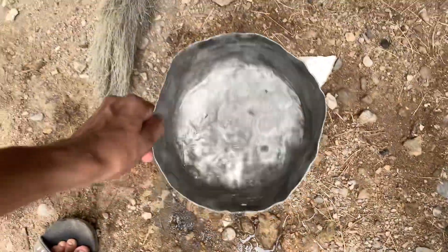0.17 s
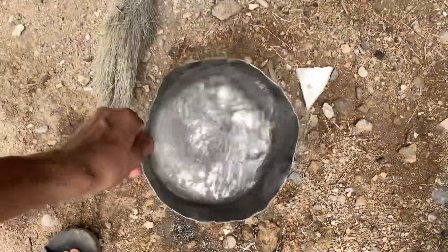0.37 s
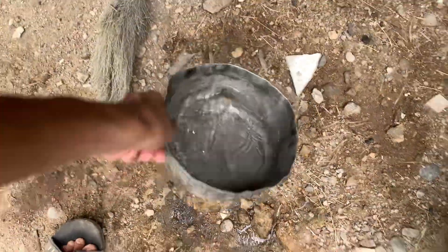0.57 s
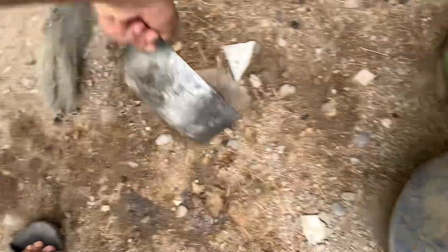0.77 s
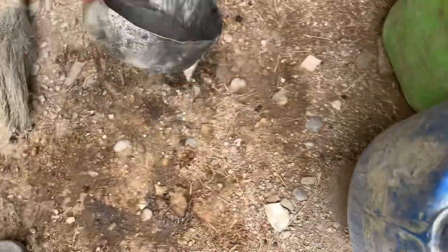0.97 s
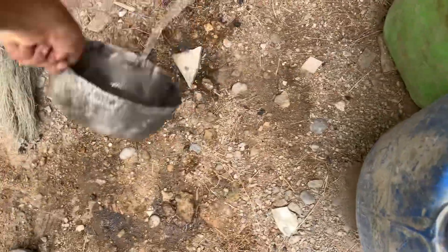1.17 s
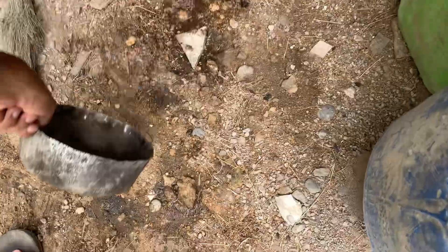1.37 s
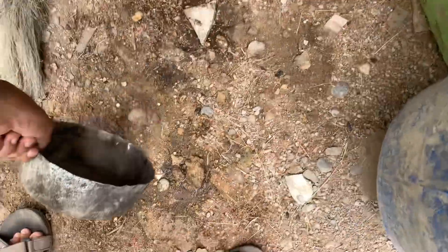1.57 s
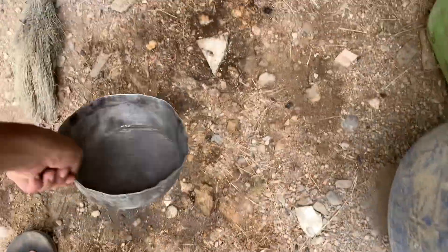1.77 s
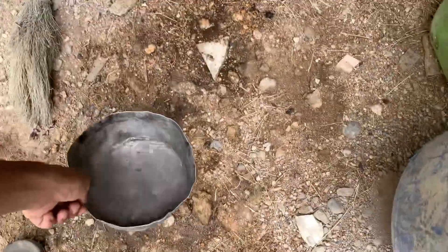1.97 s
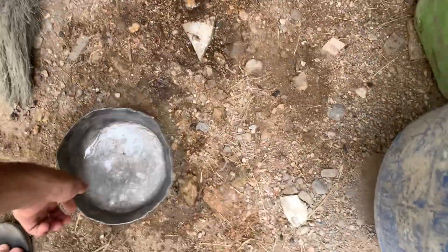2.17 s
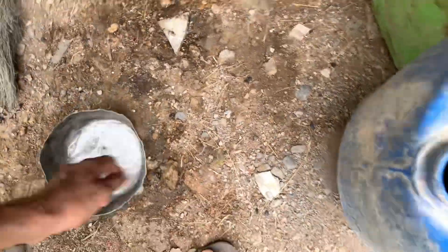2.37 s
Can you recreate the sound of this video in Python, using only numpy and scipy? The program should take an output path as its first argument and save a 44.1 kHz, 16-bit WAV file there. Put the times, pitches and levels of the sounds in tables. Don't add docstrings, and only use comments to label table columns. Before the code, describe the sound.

Metal bowl emptied of water with drips and bubbles, then scraping and three clanking knocks outdoors

```python
import sys
import numpy as np
from scipy import signal
from scipy.fft import rfft, irfft, next_fast_len
from scipy.io import wavfile
from scipy.ndimage import uniform_filter1d

SR = 44100
rng = np.random.default_rng(int(sys.argv[2]) if len(sys.argv) > 2 else 0)


def to_linear_factor(level_db):
    exponent = np.asarray(level_db, float) / 20
    return 10 ** exponent


def put_to_file(sound):
    columns = np.atleast_2d(sound).T
    safe = np.clip(columns, -1, 1)
    whole_steps = np.round(safe * 32767)
    wavfile.write(sys.argv[1], SR, whole_steps.astype(np.int16))


N = 106413

# pitch_hz, level_db [dB per Hz]
FAR_SPECTRUM = [(12, -61), (28, -18), (77, 2), (143, -13.5), (479, -27), (634, -29.5), (863, -38),
                (1020, -40), (16500, -81.5)]
# pitch_hz, level_db
FAR_SIDE_SPECTRUM = [(60, -11.5), (250, -8.5), (700, 3.5), (5000, 6.5), (15000, -25)]
# start_s, peak_db, pitch_hz, t60_s, glide_octaves_per_s
BUBBLE_EVENTS = [(0, -47, 1236, 0.18, 0.6), (0.111, -40.5, 1046, 0.24, 1.8), (0.152, -57, 1278, 0.67, 3.5),
                 (0.234, -56, 1280, 0.99, 2), (0.264, -39.5, 1800, 0.067, 1), (.295, -50, 1073, 0.12, -11),
                 (.322, -43.5, 2083, 0.19, -0.7), (.335, -45, 700, 0.089, 11.5),
                 (.37, -37, 2036, 0.13, 0.8), (.58, -60.5, 1010, 0.74, -0.5), (.11, -34, 993, 0.026, 2),
                 (0.189, -48, 2750, 0.033, 1.5), (.8, -49, 902, 0.31, .3), (.32, -45, 1700, 0.094, 0.5),
                 (.4, -55, 1255, .4, 0.8), (.38, -54, 940, 0.25, 0.5), (.43, -47, 1900, 0.1, -2.5),
                 (.465, -53, 1694, 0.18, .2), (.5, -54.5, 1904, 0.19, 1.5), (.6, -61, 2210, 0.18, 0),
                 (.715, -45, 2250, 0.037, 5), (.772, -41.5, 300, .08, 5), (.762, -40.5, 2530, 0.092, -1.5),
                 (.962, -39, 2195, 0.049, 0), (1.255, -34, 1008, 0.016, 25), (2.317, -33, 2470, 0.054, -1),
                 (.761, -41, 1743, 0.19, 3), (0.779, -33, 759, 0.054, 0), (.843, -31.5, 2290, 0.056, -4),
                 (0.846, -29, 2664, 0.041, 7.5), (0.847, -40.5, 1506, 0.11, -1),
                 (0.948, -30.5, 1437, 0.026, 1), (1.135, -41.5, 3040, 0.027, 4), (1.165, -44, 2240, .03, 6),
                 (1.44, -34, 3694, 0.028, 1.5)]
# start_s, spray_db, slosh_db
WATER_LEVELS = [(0, -63.5, -56), (.06, -72.5, -69.5), (.145, -53.5, -56), (.225, -58.5, -66.5),
                (.32, -42, -51.5), (.44, -79, -60), (.57, -74.5, -68.5), (.65, -60.5, -66),
                (.74, -60, -64.5), (.77, -50, -47), (.94, -40.5, -59), (1.13, -66.5, -77),
                (1.3, -45.5, -63), (1.43, -51.5, -69), (1.55, -76.5, -73), (1.95, -79, -77),
                (1.98, -63.5, -72.5), (2.07, -80, -81)]
# pitch_hz, level_db [dB per Hz]
SPRAY_SPECTRUM = [(1500, -44.5), (2500, -6), (4000, -8), (7000, -2), (10500, 2), (13500, -9.5),
                  (16000, -19)]
# start_s, peak_db
SNAP_EVENTS = [(0.0236, -57), (0.0692, -60), (0.0832, -40), (0.1074, -31), (0.1214, -58), (0.1311, -28.5),
               (0.1526, -15.5), (0.1694, -45), (0.1777, -63), (0.1884, -42), (0.2038, -33), (0.2284, -55),
               (0.2344, -46), (0.2472, -34), (0.2634, -34), (0.2774, -25), (0.313, -37), (0.3214, -44),
               (0.3374, -52), (0.3804, -19), (0.398, -35), (0.4277, -34.5), (0.4454, -49), (0.4798, -38),
               (0.5911, -48), (0.641, -36.5), (0.7342, -35), (0.7921, -36), (0.84, -27), (0.8594, -27),
               (0.8717, -26), (0.895, -31), (0.9114, -28), (1.0294, -46), (1.055, -44), (1.1016, -34),
               (1.1964, -39), (1.2545, -12.5), (1.2745, -3)]
# start_s, peak_db, pitch_hz, t60_s
TICK_EVENTS = [(0.0363, -38.5, 7800, 0.018), (0.1091, -31, 4740, 0.017), (0.1529, -16, 7000, 0.016),
               (0.1857, -38, 10800, 0.02), (0.204, -36.5, 7500, 0.014), (0.2583, -30.5, 9400, 0.027),
               (0.2776, -36, 11200, 0.018), (0.3685, -29.5, 7100, 0.018), (0.3803, -20.5, 10100, 0.017),
               (0.4182, -32.5, 12300, 0.023), (0.492, -39, 11000, 0.017), (0.7608, -35.5, 5530, 0.013),
               (0.842, -24, 9040, 0.018), (0.9609, -27, 7190, 0.015), (1.1601, -36, 9800, 0.013),
               (1.1957, -39.5, 8500, 0.024), (1.2492, -18, 10400, 0.018), (1.2536, -17.5, 10100, 0.021),
               (1.2745, -5, 9260, 0.016), (1.4398, -26, 3750, 0.018), (1.4666, -32.5, 10300, 0.017),
               (1.4982, -37, 11000, 0.018), (1.9669, -49, 9760, 0.018), (2.3741, -8.5, 9240, 0.016),
               (2.0232, -47.5, 8540, 0.021), (2.236, -32, 3830, 0.03)]
# start_s, level_db
SCRAPE_LEVELS = [(2.09, -74), (2.12, -54.5), (2.138, -34), (2.18, -47), (2.24, -41.5), (2.29, -46.5),
                 (2.345, -55), (2.356, -38), (2.41, -38)]
# start_s, thud_hz, thud_db, crack_db, contact_s
KNOCK_EVENTS = [
    (2.141, 741, -8.5, -8.5, 0.0028),
    (2.192, 1700, -12.5, -7.5, 0.0037),
    (2.363, 1390, -16.5, -24.5, 0.0015),
]
# pitch_hz, level_db [dB per Hz]
GRIT_SPECTRUM = [(180, -49), (550, -27), (950, -11.5), (2250, -14.5), (3640, -11.5), (8940, -12.5),
                 (16000, -40)]
BOWL_PITCHES = [291, 967, 1080, 1287, 1310, 1531, 1595, 1658, 2008, 2199, 2775, 3406, 3848, 7430]
# t60_s, first_knock_db, second_knock_db, third_knock_db
BOWL_RINGS = [(0.57, -37.5, -46.5, -44.5), (0.17, -16, -18.5, -15.5), (0.23, -44, -17.5, -23.5),
              (0.11, -15, -16.5, -33), (0.43, -21, -40, -43), (0.18, -23, -32, -22.5),
              (0.14, -34, -12.5, -28), (0.3, -45, -25.5, -37), (0.28, -65, -26, -32),
              (0.25, -18.5, -23, -31), (0.074, -14.5, -47, -28), (0.22, -28, -33.5, -33.5),
              (0.11, -21.5, -39, -42), (0.053, -13, -36, -44)]
RIM_PITCHES = [430, 820, 1940, 2422, 2522, 3110, 4005, 4720, 4860, 5460]
# t60_s, first_knock_db, second_knock_db, third_knock_db
RIM_RINGS = [(0.044, -15, -29, -31), (0.076, -16.5, -42, -39), (.2, -32.5, -33, -36),
             (0.31, -35, -34, -31.5), (.1, -29, -30, -23.5), (0.12, -29, -35, -37), (0.18, -29, -34.5, -34),
             (0.11, -26.5, -40, -34), (0.071, -30, -38, -38), (.13, -40, -30.5, -50)]
PRESSED_PITCH_FACTORS = [1, 1, .98]
PRESSED_T60_FACTORS = [1, 1, .55]
# pitch_hz, level_db
NEAR_SIDE_SPECTRUM = [(200, -14), (1000, -4), (4000, 0), (8000, 0), (13000, -18.5)]


def along(table, hz):
    p = np.array(table, float)
    return np.interp(np.log(hz + 1), np.log(p[:, 0]), p[:, 1])


def unit(x):
    return x / np.sqrt(np.mean(x ** 2))


def colour(x, table):
    gain = to_linear_factor(along(table, np.fft.rfftfreq(len(x), 1 / SR)))
    return unit(irfft(rfft(x) * gain, len(x)))


def curve(table, index):
    p = np.array(table, float)
    return to_linear_factor(np.interp(np.arange(N) / SR, p[:, 0], p[:, index]))


def fade(t60, rise):
    t = np.arange(int(t60 * SR) + 64) / SR
    return t, (1 - np.exp(-t / rise)) * to_linear_factor(-60 * t / t60)


def add(out, s, x):
    i = max(int(s * SR), 0)
    out[i:i + len(x)] += x[:max(N - i, 0)]


def ring(hz, t60, glide, rise):
    t, env = fade(t60, rise)
    pitch = np.minimum(hz * 2 ** (glide * t), SR / 3)
    return env * np.sin(2 * np.pi * np.cumsum(pitch) / SR)


def patter(per_s, scatter_db):
    chance, sign, size = rng.random((3, N))
    return (chance < per_s / SR) * np.sign(sign - 0.5) * to_linear_factor(-scatter_db * np.log(size + 0.01))


def band(x, hz, width):
    edges = [hz / (1 + width), min(hz * (1 + width), SR / 2.2)]
    return signal.sosfilt(signal.butter(1, edges, "band", fs=SR, output="sos"), x)


def burst(noise, hz, width, wider, env):
    return env * unit(band(band(noise, hz, width), hz, wider))[-len(env):]


def grains(table, per_s, scatter_db):
    out = 0
    for hz in 300 * 2 ** np.arange(0, 5.8, 1 / 3):
        steps = np.repeat(rng.standard_normal(N // 800 + 1), 800)[:N]
        flicker = uniform_filter1d(steps, size=800)
        clicks = patter(per_s, scatter_db) + 0.3 * rng.standard_normal(N)
        x = band(band(clicks, hz, 0.19), hz, 0.19)
        out = out + unit(x) * np.sqrt(hz) * to_linear_factor(along(table, hz) + 5.1 * flicker)
    return unit(out)


def far_traffic():
    mid, side = (colour(rng.standard_normal(N), FAR_SPECTRUM) for _ in range(2))
    side_gain = to_linear_factor(along(FAR_SIDE_SPECTRUM, np.fft.rfftfreq(N, 1 / SR)))
    side = irfft(rfft(side) * side_gain, N)
    return to_linear_factor(-47.5) * np.array([mid + side, mid - side])


def bubbles():
    out = np.zeros(N)
    for s, db, hz, t60, glide in BUBBLE_EVENTS:
        add(out, s, to_linear_factor(db) * ring(hz, t60, glide, 0.0012))
    return out


def slosh():
    bubbles_per_s, low_hz, high_hz, t60_s = 800, 700, 2340, 0.042
    crowd = np.zeros(N)
    for when, pitch, size, length, bend in rng.random((int(bubbles_per_s * N / SR), 5)):
        hz = low_hz * (high_hz / low_hz) ** pitch
        t60 = t60_s * (0.4 + 6 * length ** 3)
        level = to_linear_factor(-3.0 * np.log(size + 0.011))
        add(crowd, when * N / SR, level * ring(hz, t60, 1.6 * bend - 0.4, 0.00076))
    rush = unit(band(rng.standard_normal(N), 1400.0, 0.62))
    return (unit(crowd) + to_linear_factor(-3) * rush) * curve(WATER_LEVELS, index=2)


def spray():
    return grains(SPRAY_SPECTRUM, per_s=1200, scatter_db=3.5) * curve(WATER_LEVELS, index=1)


def snaps():
    out, env = np.zeros(N), fade(0.005, 0.0001)[1]
    for (s, db), noise in zip(SNAP_EVENTS, rng.standard_normal((len(SNAP_EVENTS), 3000))):
        add(out, s, to_linear_factor(db - 4.5) * burst(noise, 11000, 0.45, 0.45, env))
    return out


def ticks():
    out, rows = np.zeros(N), TICK_EVENTS
    width = 0.13
    for (s, db, hz, t60), noise in zip(rows, rng.standard_normal((len(rows), 6000))):
        env = fade(min(t60, 0.12), 0.00042)[1]
        add(out, s, to_linear_factor(db - 6) * burst(noise, hz, width, 2 * width, env))
        add(out, s + 0.0008, to_linear_factor(db + 0.5) * ring(hz, 14 / hz, 0, 0.77 / hz))
    return out


def emptied_hum():
    out = np.zeros(N)
    add(out, 1.03, to_linear_factor(-63) * (ring(1450, 1, 0, 0.02) + ring(2900, 1, 0, 0.02)))
    return out


def splash():
    start_s, length_s, rise_s, level_db = 1.25, 0.025, 0.0061, -28.5
    t = np.arange(N) / SR - start_s
    env = np.clip(t / rise_s + 1, 0, 1) * np.exp(-np.maximum(t - length_s / 2, 0) / length_s * 3)
    noise = patter(9000, 1.4) + 2 * rng.standard_normal(N)
    wide = colour(noise, [(250, -0.5), (2000, 1), (4500, -1.0), (10000, 6.0), (16000, -19.5)])
    return to_linear_factor(level_db) * env * wide


def scrape(grit):
    shaken = unit(sum(band(grit, hz, 0.0063) for hz in BOWL_PITCHES[1:-3]))
    drag = (grit + to_linear_factor(-2.0) * shaken)[::-1]
    started = np.arange(N) > SCRAPE_LEVELS[0][0] * SR
    return to_linear_factor(-1) * drag * curve(SCRAPE_LEVELS, index=1) * started


def knocks(grit):
    out = np.zeros(N)
    rough = rng.standard_normal((len(KNOCK_EVENTS), 8192))
    for k, (s, hz, thud_db, crack_db, contact) in enumerate(KNOCK_EVENTS):
        for ring_hz, mode in zip(BOWL_PITCHES + RIM_PITCHES, BOWL_RINGS + RIM_RINGS):
            pitch, t60 = ring_hz * PRESSED_PITCH_FACTORS[k], mode[0] * PRESSED_T60_FACTORS[k]
            x = ring(pitch, t60, 0, contact)
            flutter = np.interp(np.arange(len(x)), np.arange(200) * 350, rng.standard_normal(200))
            add(out, s, to_linear_factor(mode[1 + k] + 1.5 * flutter) * x)
        thud_env = fade(0.043, contact)[1]
        add(out, s - contact / 2, to_linear_factor(thud_db) * burst(rough[k], hz, 0.33, 0.36, thud_env))
        add(out, s, to_linear_factor(thud_db + 3.5) * ring(hz, 0.024, 0, contact / 2))
        crack_env = fade(0.049, contact)[1]
        add(out, s - contact / 2, to_linear_factor(crack_db) * crack_env * grit[k * 9000:][:len(crack_env)])
    add(out, KNOCK_EVENTS[1][0], to_linear_factor(-20) * ring(166, 0.05, -4.0, 0.0016))
    return out


def smear(x, t60, table):
    env, n = fade(t60, 0.0001)[1], next_fast_len(N + SR // 2)
    tail = env * rng.standard_normal(SR)[:len(env)] / np.sqrt(np.sum(env ** 2))
    gain = to_linear_factor(along(table, np.fft.rfftfreq(n, 1 / SR)))
    return irfft(rfft(x, n) * rfft(tail, n) * gain, n)[:N]


def scene():
    grit = grains(GRIT_SPECTRUM, per_s=900, scatter_db=3.9)
    near = bubbles() + slosh() + spray() + snaps() + ticks() + emptied_hum() + splash()
    near = near + scrape(grit) + knocks(grit)
    mid = near + to_linear_factor(-16) * smear(near, 0.052, [(300, -16.5), (1500, 1), (12000, 6)])
    side_gain = to_linear_factor(along(NEAR_SIDE_SPECTRUM, np.fft.rfftfreq(N, 1 / SR)))
    turned = irfft(-1j * rfft(mid) * side_gain, N)
    side = to_linear_factor(-1.5) * turned + to_linear_factor(-6.5) * smear(near, 0.02, NEAR_SIDE_SPECTRUM)
    pan_db = 1.3
    left = (mid + side) * to_linear_factor(pan_db / 2)
    right = (mid - side) * to_linear_factor(-pan_db / 2)
    return np.array([left, right]) + far_traffic()


def low_pass(x):
    return signal.sosfilt(signal.butter(12, 16810, fs=SR, output="sos"), x)


def record(dry):
    rounded = np.tanh(dry)
    top_cut = signal.ellip(8, 0.2, 60, 16300, fs=SR, output="sos")
    mix = signal.sosfilt(top_cut, rounded)
    return low_pass(mix)


dry = scene()
out = record(dry)
put_to_file(out)
```